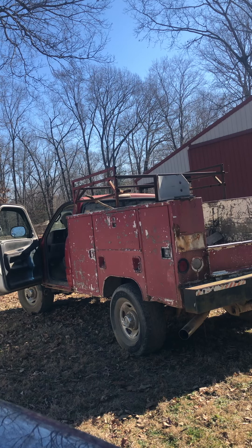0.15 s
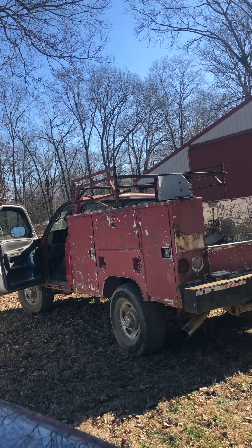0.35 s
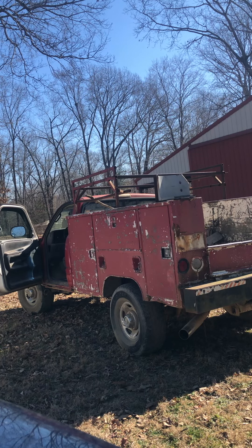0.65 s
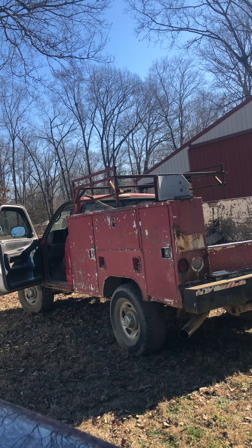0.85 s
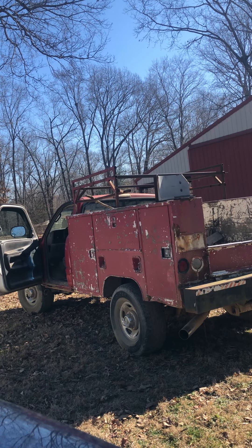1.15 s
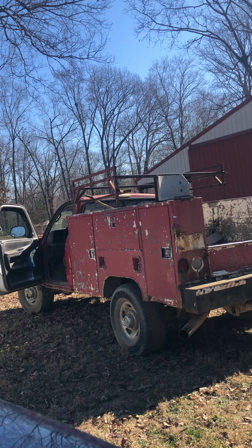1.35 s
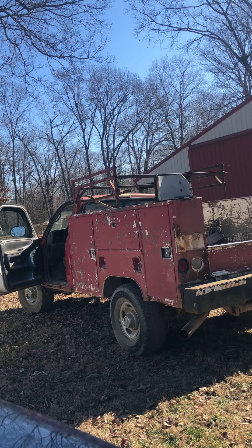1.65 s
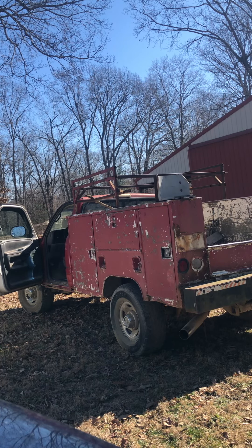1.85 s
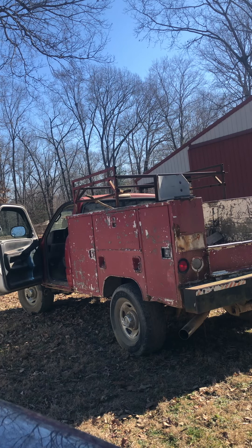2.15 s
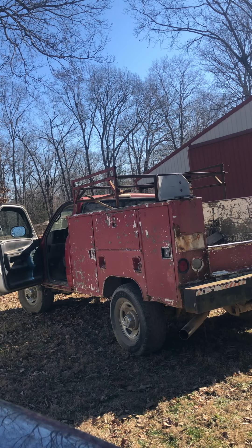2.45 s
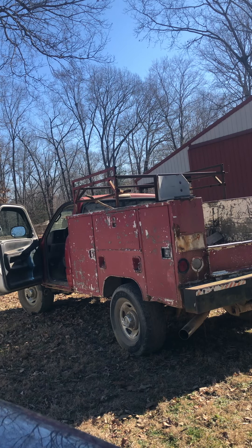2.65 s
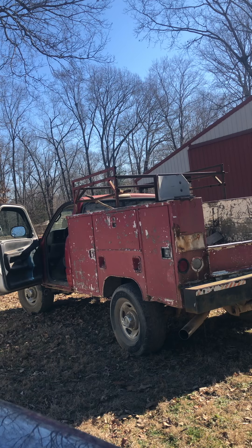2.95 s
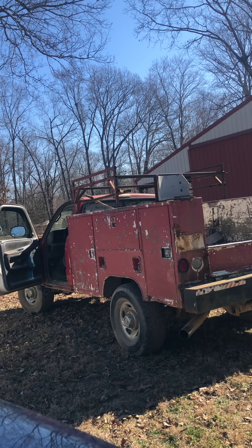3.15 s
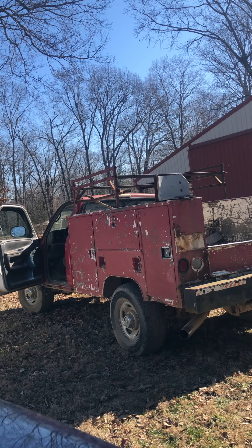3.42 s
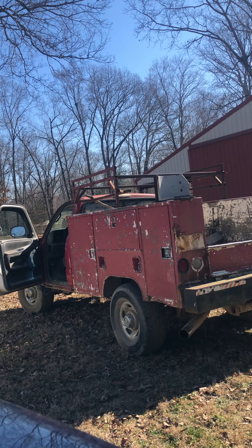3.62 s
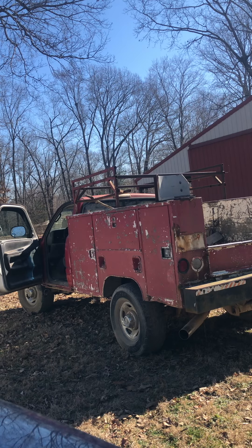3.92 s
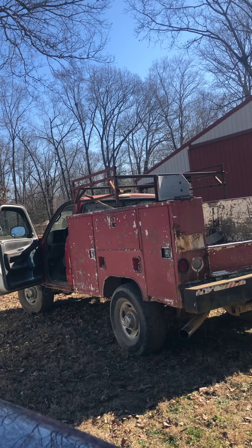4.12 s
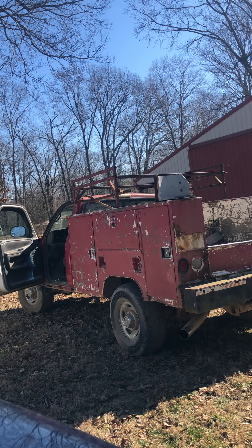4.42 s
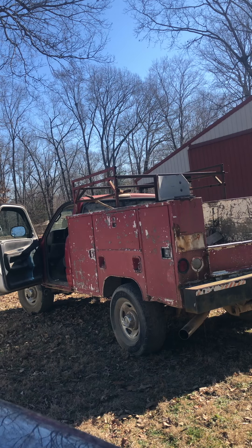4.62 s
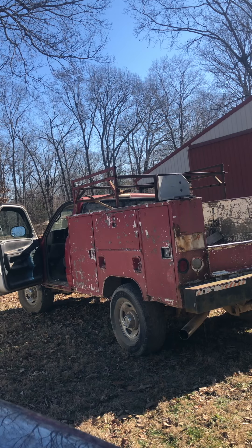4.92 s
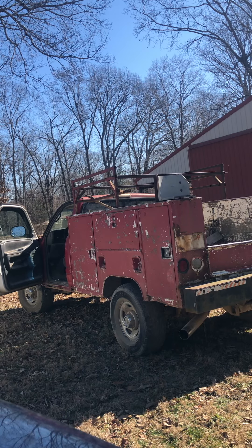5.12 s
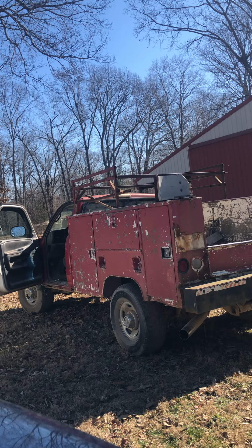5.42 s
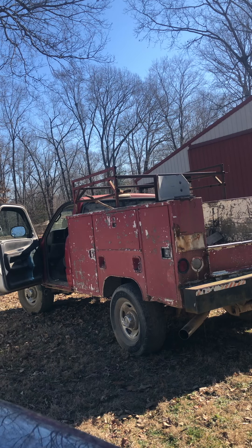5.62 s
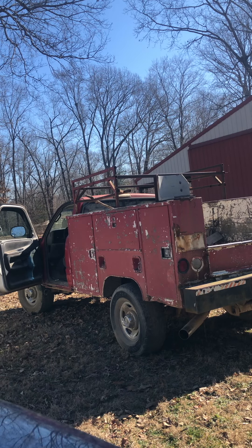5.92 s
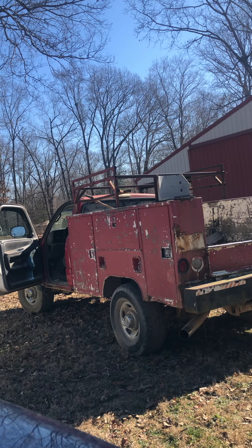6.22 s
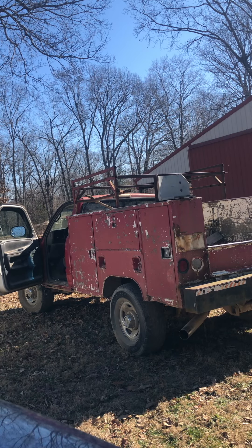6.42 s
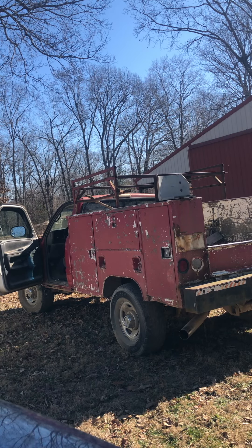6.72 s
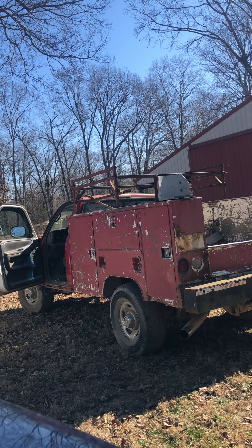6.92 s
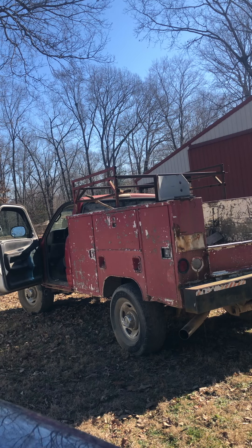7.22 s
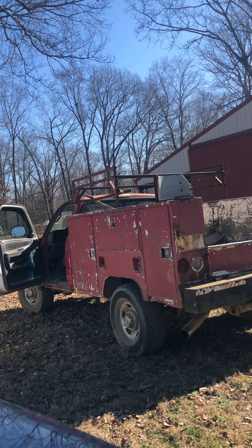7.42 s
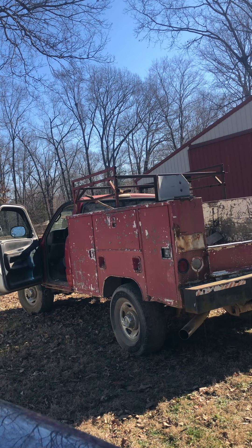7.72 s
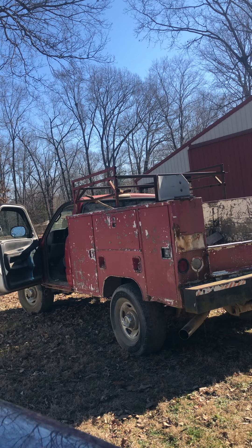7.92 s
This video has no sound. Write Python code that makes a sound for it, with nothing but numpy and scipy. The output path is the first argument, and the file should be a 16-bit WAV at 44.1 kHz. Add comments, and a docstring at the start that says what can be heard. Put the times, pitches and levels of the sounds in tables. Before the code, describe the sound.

Birds chirp over a faint rumble until a sharp clack sets a cold diesel pickup cranking, whining and chuffing without catching.

```python
"""Small birds trill and call over a distant rumble, in a quiet farmyard by a wood.
A far hum wavers, and a few small clicks come from dry leaves and the cab of a cold diesel pickup.
Then the starter's solenoid (an electric plunger) clacks a small gear into place to crank the engine.
The gear whine sags and grinds each time a piston squeezes its air, about five times a second,
and the engine chuffs in between."""
import sys
import numpy as np
from scipy import signal
from scipy.fft import rfft, irfft, next_fast_len
from scipy.io import wavfile
from scipy.ndimage import uniform_filter1d, map_coordinates

SR = 44100
rng = np.random.default_rng(int(sys.argv[2]) if len(sys.argv) > 2 else 0)


def transcribe(signal):
    """Save signal, clipped to [-1, 1], as a 16-bit WAV file at the path in sys.argv[1]."""
    frames = np.atleast_2d(signal).T
    limited = np.clip(frames, -1, 1)
    pcm = np.round(limited * 32767).astype(np.int16)
    wavfile.write(sys.argv[1], SR, pcm)


N = 355887
TIME = np.arange(N) / SR
FREQ = np.fft.rfftfreq(N, 1 / SR)

# the engine's first slow heave from rest; levels are relative
# (time [s], gear pitch [Hz], grind [dB], whine [dB], rasp [dB])
FIRST_HEAVE = [(5.53, 190.7, -40.5, -49.5, -41.5), (5.615, 480.8, -32.5, -43, -41),
               (5.64, 521.8, -28.5, -36, -37.5), (5.715, 575.6, -32.5, -32.5, -37.5),
               (5.76, 720.5, -34, -30.5, -36), (5.805, 750.5, -36, -30, -35.5),
               (5.853, 565.8, -28, -28, -36), (5.89, 520, -33, -57, -43.5), (5.95, 480, -40, -58, -55.5),
               (6.005, 769, -34, -42, -40.5), (6.06, 988, -40.5, -57, -38)]


def gain_of(db):
    """Turns decibels into a number to multiply a sound by."""
    return 10 ** (np.asarray(db) / 20)


def evened(x):
    """Scales a signal to an average strength (rms) of 1."""
    return x / np.sqrt(np.mean(x ** 2) + 1e-20)


def gain_at(points, hz):
    """Reads the gain at hz from a curve of (frequency [Hz], level [dB]) points."""
    f, db = np.transpose(points)
    return gain_of(np.interp(np.log(hz + 1), np.log(f + 1), db))


def colour(x, gain):
    """Filters a sound by a gain for each frequency in FREQ; ringing comes only after its cause."""
    size = next_fast_len(N + SR // 2)
    log_gain = np.log(np.interp(abs(np.fft.fftfreq(size, 1 / SR)), FREQ, gain) + 1e-5)
    response = np.exp(np.conj(signal.hilbert(log_gain)))[:size // 2 + 1]
    return irfft(rfft(x, size) * response, size)[:N]


def wander(hz):
    """A smooth random wobble of strength 1 that passes hz random values a second."""
    knots = rng.standard_normal(8000)
    return evened(map_coordinates(knots, [TIME * hz], order=2, mode="wrap"))


def ramp(length):
    """Runs from 0 to 1 in the given seconds."""
    return np.linspace(0, 1, max(int(length * SR), 16))


def add(mix, s, sound):
    """Mixes a sound in, starting at s seconds."""
    start = round(s * SR)
    sound = sound[max(-start, 0):]
    part = mix[max(start, 0):][:len(sound)]
    part += sound[:len(part)]


def echoes(x, fade_s, delay_s):
    """Scattered reflections that die away by 60 dB in fade_s."""
    t = np.arange(SR) / SR
    taps = rng.standard_normal(SR) * (rng.random(SR) < .1) * (t > delay_s) * gain_of(-60 * t / fade_s)
    return signal.oaconvolve(x, taps / np.linalg.norm(taps))[:N]


def yard(air_db=-56, hum_hz=118):
    """A distant rumble in still air, and a far, wavering hum."""
    # tone colour of the air (frequency [Hz], relative level [dB])
    air_colour = [(15, -48), (25, -34), (42, -8.5), (86, -2), (116, -0.5), (260, -12), (457, -18),
                  (552, -19), (895, -20.5), (1240, -26), (1660, -29.5), (2170, -34), (3090, -36),
                  (3830, -35.5), (15500, -49.5)]
    # loudness the hum wavers around (time [s], level [dB])
    hum_levels = [(0, -68), (3.3, -68), (4, -60.5), (4.6, -66), (5.1, -57), (8.07, -60.5)]
    air = evened(colour(rng.standard_normal(N), gain_at(air_colour, FREQ)))
    air *= gain_of(air_db + .5 * wander(4.2))
    hum = np.sqrt(2) * np.sin(2 * np.pi * np.cumsum(hum_hz + 3 * wander(15)) / SR)
    return air + hum * gain_of(np.interp(TIME, *np.transpose(hum_levels)) + 0.82 * wander(5.0))


def chirp(hz, db, taper=0.51):
    """A pure whistle along a pitch curve, with soft ends."""
    return gain_of(db) * signal.windows.tukey(len(hz), taper) * np.sin(2 * np.pi * np.cumsum(hz) / SR)


def trills(hook_s=.011, lead_s=.027, ahead_s=.039):
    """A close bird sings runs of notes that sweep up and hook down; each run sinks and slows."""
    # one row a run (time [s], notes [count], gap [s], last note's delay [s], upsweep [s], top pitch [Hz],
    # extra pitch at the start [Hz], place of greatest loudness [note number], level there [dB])
    runs = [(.009, 4, .0757, 0.00062, .017, 5640, 0, 1, -49),
            (.327, 3, 0.082, 0.0046, 0.019, 5580, 3, -1.5, -51),
            (3.153, 10, .0735, .025, 0.014, 6300, 780, 4, -50.5)]
    sweep_from, hook_to, sink_per_note = .56, .74, .0071  # shares of the top pitch
    song, lead = np.zeros((2, N))
    for start, count, gap, lag, sweep, hz, lift_hz, loudest, peak_db in runs:
        rise = 1 - (1 - sweep_from) * (1 - ramp(sweep)) ** 1.6
        fall = 1 - (1 - hook_to) * ramp(hook_s) ** 1.5
        bend = np.r_[rise, fall]
        shape_db = -42 * (1 - bend) + np.r_[np.zeros(len(rise)), -16 * ramp(hook_s)]  # loudest on top
        for k in range(round(count)):
            s = start + k * gap + lag * (k / (count - 1)) ** 7.3
            top_hz = hz * (1 - sink_per_note * k) + lift_hz * np.exp(-k / 1.04)
            db = peak_db - 0.35 * (k - loudest) ** 2
            add(song, s - sweep, chirp(top_hz * bend, db + shape_db, taper=0.12))
            # the other side of the bird's voice box leads in with a softer, hoarse upsweep
            lead_hz = top_hz * (.74 + .38 * ramp(lead_s) ** 1.4)
            add(lead, s - ahead_s, chirp(lead_hz, db - 11, taper=0.79))
    return song * gain_of(0.2 + 2 * wander(500)) + lead * wander(1200)


def whistles(chip_s=.015, chip_gap_s=.021, held_s=.2):
    """Birds whistle thin arches, and quick chips that sink into a held note; all slightly hoarse."""
    # whistles that rise and fall (time [s], length [s], top pitch [Hz], relative level [dB])
    arches = [(.478, .063, 7450, -66), (.481, 0.064, 8800, -70), (0.56, 0.071, 7200, -68),
              (3.024, 0.068, 7650, -63), (3.373, .078, 8260, -66), (3.493, 0.05, 7250, -59.5),
              (5.118, .018, 5380, -62)]
    # chips, then a held note; levels are relative (time [s], chips [count], chip pitch [Hz],
    # chip level [dB], wait for the note [s], note pitch [Hz], note level [dB])
    chip_calls = [(1.133, 4, 3550, -59, 0.15, 2710, -67), (5.128, 5, 3510, -57.5, .125, 2630, -67.5)]
    arch_drop, chip_rise, chip_sink = .13, .096, .083  # shares of the pitch
    song = np.zeros(N)
    for s, length, top_hz, db in arches:
        add(song, s, chirp(top_hz * (1 - arch_drop * abs(2 * ramp(length) - 1) ** 2.8), db))
    for s, count, hz, db, wait, held_hz, held_db in chip_calls:
        for k, progress in enumerate(np.linspace(0, 1, round(count))):
            spent = progress ** 3
            pitch = hz * (1 - chip_sink * spent + chip_rise * (1 - spent) * (ramp(chip_s) - .5))
            add(song, s + k * chip_gap_s, chirp(pitch, db + 6 * (progress - .5)))
        add(song, s, blur(length=0.21, hz=hz * 0.85, db=db - 15))
        add(song, s + wait, chirp(held_hz * (1 - 0.031 * (ramp(held_s) - .5)), held_db))
    return song * gain_of(3.6 * wander(300))


def blur(length, hz, db, width_hz=480):
    """A call so scattered by tree trunks that only a narrow hiss around its pitch arrives."""
    size = int(length * SR)
    band = signal.butter(2, [hz - width_hz / 2, hz + width_hz / 2], "bandpass", fs=SR, output="sos")
    hiss = evened(signal.sosfilt(band, rng.standard_normal(size)))
    return gain_of(db) * hiss * signal.windows.tukey(size, .7)


def far_calls():
    """Other birds answer from deep in the wood, heard only as a blur."""
    # distant calls (time [s], length [s], pitch [Hz])
    calls = [(0.597, 0.3, 2950), (.657, .22, 5650), (1.45, .2, 5600), (1.682, .35, 3050),
             (2.103, 0.2, 5300), (2.854, 0.2, 5650), (2.91, 0.25, 2920), (4.46, 0.36, 3100)]
    out = np.zeros(N)
    for s, length, hz in calls:
        add(out, s, blur(length, hz, db=-78))
    return out


def birds():
    """All the birds together: bare trees scatter the songs, the farther ones most."""
    near, farther = trills(), whistles()
    wood = echoes(gain_of(-12.5) * near + gain_of(-9.0) * farther, fade_s=0.96, delay_s=0.012)
    branches = gain_of(-9) * echoes(near, fade_s=0.092, delay_s=.001)
    return near + gain_of(-3.0) * farther + wood + branches + far_calls()


def clicks():
    """Short snaps about the cab and in dry leaves: bursts of noise, each dull or bright."""
    # one row a snap (time [s], peak level [dB], brightness [Hz], decay time [s])
    snaps = [(.648, -55, 9200, .005), (1.175, -54, 9000, .002), (1.240, -58, 9000, .008),
             (1.782, -46, 1700, .004), (3.931, -48.5, 4190, .0011), (5.356, -51.5, 3500, .0067),
             (5.470, -61, 3920, .004), (5.521, -50, 3470, .008)]
    out, t = np.zeros(N), np.arange(SR // 16) / SR
    for s, db, bright_hz, decay in snaps:
        band = signal.butter(2, [bright_hz / 8, min(bright_hz * 2, SR / 2.2)], "bandpass", fs=SR)
        snap = signal.lfilter(*band, rng.standard_normal(len(t))) * np.exp(-t / decay)
        add(out, s, gain_of(db) * snap / abs(snap).max())
    return out


def solenoid(hit_s=5.5372, decay_s=0.0057):
    """The plunger slides, then throws the starter's small gear home: a bright clack of steel."""
    # tone colour of the clack (frequency [Hz], relative level [dB])
    steel = [(300, -23), (1700, 9.0), (2800, -9), (4200, 6.5), (6000, -5), (9000, -15), (15000, -14)]
    age, slide_age = np.maximum(TIME - hit_s, 0), np.maximum(TIME - hit_s + 0.0053, 0)
    ring = evened(colour(rng.standard_normal(N), gain_at(steel, FREQ)))
    blow = 2 * (1 - np.exp(-age / 0.002)) * np.exp(-age / decay_s)
    slide = gain_of(-8) * (1 - np.exp(-slide_age / 0.0022)) * np.exp(-slide_age / 0.023)
    return gain_of(-30.5) * ring * (blow + slide)


def crank_motion():
    """Gear pitch and strength of grind, whine, rasp and chuff: each piston's squeeze brakes the gears."""
    # one row a squeeze; levels are relative (time [s], unbraked gear pitch [Hz],
    # time until the piston is at the top [s], grind [dB], whine [dB], knock [dB])
    strokes = np.array([(6.068, 990.7, 0.068, -26.5, -30, -42), (6.271, 978.1, .072, -26, -29, -30),
                        (6.467, 981.4, 0.074, -26, -31.5, -30), (6.630, 989.2, 0.089, -25.5, -24, -40),
                        (6.842, 1063, 0.074, -23.5, -27.5, -34), (7.011, 1020, 0.075, -24, -26, -30),
                        (7.200, 998.7, 0.082, -23, -28, -25.5), (7.383, 970.7, .088, -24.5, -26.5, -37),
                        (7.555, 929.7, .1, -26.5, -26, -40), (7.750, 911.3, .1, -26.5, -25, -40),
                        (7.952, 923, 0.099, -26, -25.5, -38)])
    speed_loss, recover_s = .395, .1
    bite_s, let_go_s, grind_fade_s = .0046, .032, .12
    stroke = np.maximum(np.searchsorted(strokes[:, 0], TIME) - 1, 0)
    start, free_hz, squeeze_s, grind_db, whine_db, knock_db = strokes[stroke].T
    next_hz = strokes[np.minimum(stroke + 1, len(strokes) - 1), 1]
    age = np.maximum(TIME - start, 0)
    past_top = np.maximum(age - squeeze_s, 0)
    recovered = np.sin(np.pi / 2 * np.minimum(past_top / recover_s, 1)) ** 2
    sag = np.minimum(age / squeeze_s, 1) ** 2.3 * (1 - recovered)
    # the load bites at once and lets go after the piston passes the top
    bite = np.minimum(age / bite_s, 1)
    slack = 1 - bite * np.exp(-past_top / let_go_s)
    gear_hz = (free_hz + recovered * (next_hz - free_hz)) * (1 - speed_loss * sag)
    grind_db = grind_db - 13 * (1 - bite * np.maximum(1 - past_top / grind_fade_s, 0))
    whine_db = whine_db - 16.5 * slack - 4 * sag
    rasp_db = -33.5 - 5 * slack - 3.5 * sag
    # each cylinder chuffs just after the top, over the engine's steady churn
    chuff_db = -45 + 7 * np.exp(-((age - squeeze_s - .032) / .043) ** 2)
    # as the piston springs back, the teeth cross the small gap between them and knock
    knock = gain_of(knock_db) * np.exp(-((past_top - .032) / .012) ** 2)
    cranking = [gear_hz, grind_db, whine_db, rasp_db, chuff_db]
    heave_times, *columns = np.transpose(FIRST_HEAVE)
    heave = [np.interp(TIME, heave_times, column) for column in columns] + [-41]  # steady chuff level
    heave[0] = uniform_filter1d(heave[0], size=1200)  # the flywheel rounds off changes of speed
    pitch, *levels = [np.where(age > 0, later, first) for first, later in zip(heave, cranking)]
    grind, whine, rasp, chuff = [gain_of(db) * (TIME > heave_times[0]) for db in levels]
    return pitch, np.hypot(grind, knock), whine, rasp, chuff


def tooth_blows(teeth_passed, uneven_db, scrape):
    """Each gear tooth strikes once, then scrapes while it slides."""
    strength = gain_of(uneven_db * np.clip(rng.standard_normal(N), -2, 2))
    strikes = np.diff(np.floor(teeth_passed), prepend=0) * strength
    sliding = (1.0 + np.exp(-(teeth_passed % 1) / 0.71)) * rng.standard_normal(N)
    return evened(strikes * rng.choice([-1, 1], N)) + scrape * evened(sliding)


def starter(small_gear_teeth=11):
    """The small gear whines and grinds on the engine's big one, ringing their case; cylinders chuff."""
    # ringing notes of the metal case (frequency [Hz], width [Hz], boost [dB])
    case_notes = [(865, 6.2, 13), (901.4, 7.4, 9), (1001, 7.6, 6), (1041.3, 11.7, 13.5), (1108, 18, 7.5),
                  (1179, 22, 5.5), (1529, 65, 6), (1626, 15, 9), (1832, 16, 6), (2040, 77, 0),
                  (2180, 21, -4), (2600, 100, 3), (3140, 29, -2), (4150, 170, 5.5), (4520, 100, 6),
                  (4460, 80, 9), (5970, 91, 4), (6150, 65, -6), (9660, 170, -3)]
    # tone colour of the grinding gears (frequency [Hz], relative level [dB])
    grind_colour = [(200, -30), (450, -20), (650, -5.5), (800, -0.5), (1030, -2), (1330, -5), (1600, -3.5),
                    (2000, -3), (2400, -14.5), (3200, -16.5), (6000, -39.5)]
    # dry rasp of the teeth (frequency [Hz], relative level [dB])
    rasp_colour = [(1200, -19), (2300, 3.5), (2900, 0.5), (3300, 0.5), (3700, -1), (4400, -5), (5200, 0),
                   (6200, -3.5), (7200, -8.5), (9200, -11), (10500, -16.5), (13000, -20), (15800, -18)]
    # how well the gear tone passes into the air (frequency [Hz], relative level [dB])
    whine_colour = [(350, -20), (570, -14.5), (730, 0), (880, -4), (1020, -8), (1160, 1), (1350, -8.5),
                    (1530, -3), (1800, -9), (2200, -9.5), (3000, -23.5), (6000, -35)]
    # chuff of the engine and its pipe (frequency [Hz], relative level [dB])
    chuff_colour = [(30, -30), (46, 1), (80, -13), (155, -2.5), (190, -3), (217, 8.5), (245, -6.5),
                    (282, 4.5), (315, -12.5), (357, 6), (395, -4), (436, 4), (475, -2.5), (600, 2.5),
                    (1200, -57.5)]
    pitch, grind, whine, rasp, chuff = crank_motion()
    teeth_passed = np.cumsum(pitch * (1 + .013 * wander(240))) / SR
    ringing = sum(gain_of(2 * db) / (1 + (2 * (FREQ - hz) / width) ** 2) for hz, width, db in case_notes)
    case = np.sqrt(1 + ringing)
    running = TIME > FIRST_HEAVE[1][0]
    blows = tooth_blows(teeth_passed, uneven_db=0.0, scrape=1.0)
    gears = colour(blows, gain_at(grind_colour, FREQ) * case)
    scrapes = tooth_blows(teeth_passed, uneven_db=-1.5, scrape=6.6)
    teeth = colour(scrapes, gain_at(rasp_colour, FREQ) * case)
    tone = np.zeros(N)
    for harmonic in range(1, 8):
        strength = np.sqrt(2) * gain_at(whine_colour, harmonic * pitch) * gain_of(3.2 * wander(160))
        tone += strength * np.sin(2 * np.pi * (harmonic * teeth_passed + rng.random()))
    tone = colour(whine * tone, case)  # swells as it slides through each note of the case
    # many small steel resonances ring along with the rasp
    teeth = teeth + 0.39 * echoes(teeth, fade_s=0.02, delay_s=.001)
    teeth = teeth / teeth[running].std()
    # harder contact is brighter: the rasp's treble grows faster than the rest
    dull = colour(teeth, 1 / np.sqrt(1 + (FREQ / 4000) ** 2))
    hardness = np.clip(rasp / gain_of(-35.5), 0, 1.5) ** 0.7
    rasping = rasp * (dull + hardness * (teeth - dull))
    # the small gear runs slightly off centre, so the sound throbs once a turn
    throb = gain_of(np.sin(2 * np.pi * teeth_passed / small_gear_teeth) + 1.17 * wander(110))
    gear_sound = throb * (grind * gears / gears[running].std() + rasping + tone)
    pipe = chuff * evened(colour(rng.standard_normal(N), gain_at(chuff_colour, FREQ)))
    reflections = echoes(gear_sound, fade_s=0.042, delay_s=.004)
    return gain_of(-2.0) * gear_sound + gain_of(-13.0) * reflections + pipe


def scene():
    """Everything as heard from behind the truck, in one channel."""
    return (yard() + birds() + clicks() + solenoid() + starter())[None]


def record(dry):
    """Cuts away the very highest treble."""
    edge_hz = 15850
    low_pass = signal.firwin(511, edge_hz, window=("kaiser", 9), fs=SR)
    return signal.oaconvolve(dry, low_pass[None], "same")


dry = scene()
out = record(dry)
transcribe(out)
```